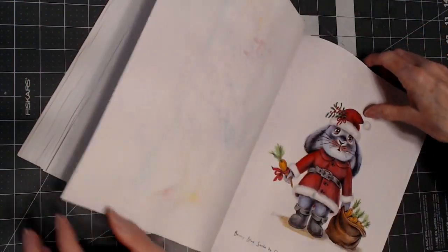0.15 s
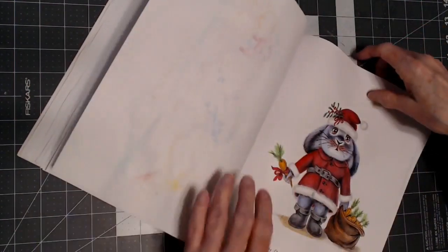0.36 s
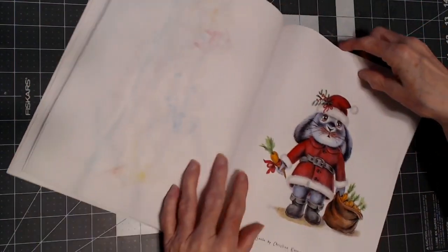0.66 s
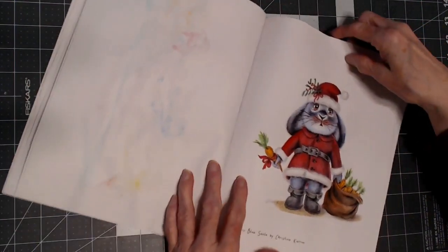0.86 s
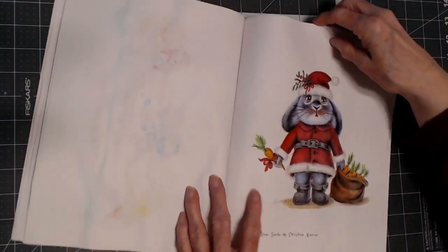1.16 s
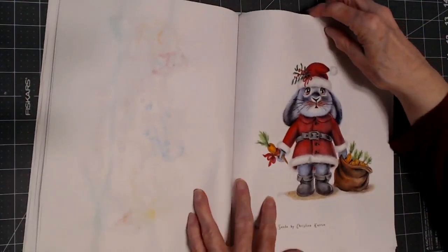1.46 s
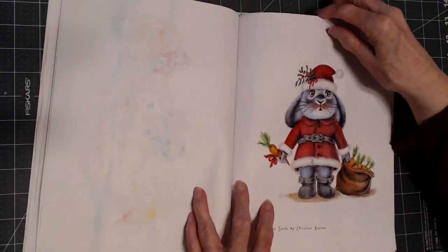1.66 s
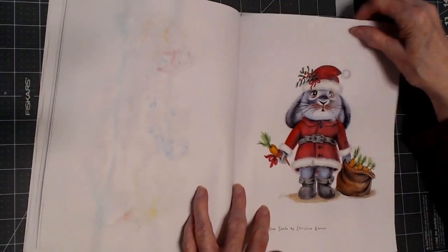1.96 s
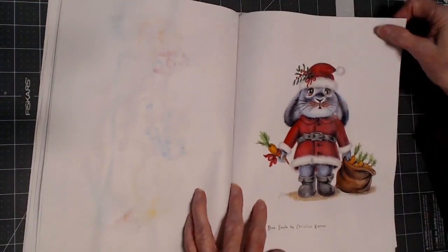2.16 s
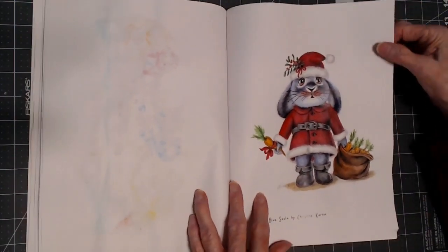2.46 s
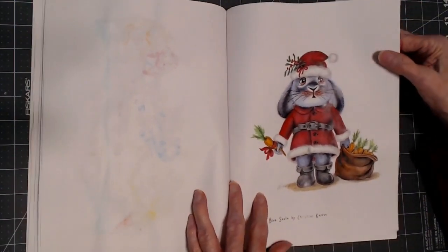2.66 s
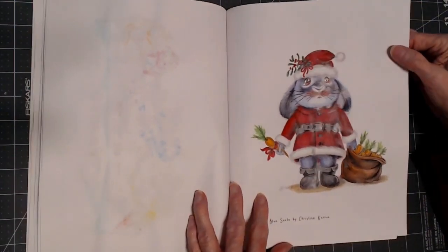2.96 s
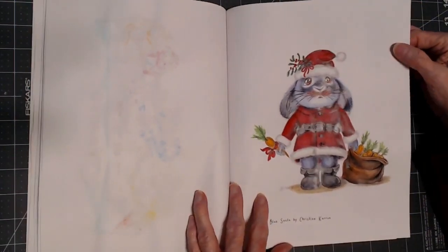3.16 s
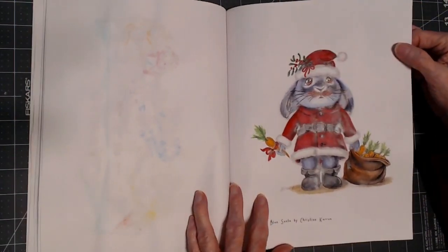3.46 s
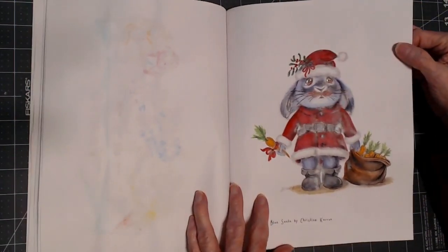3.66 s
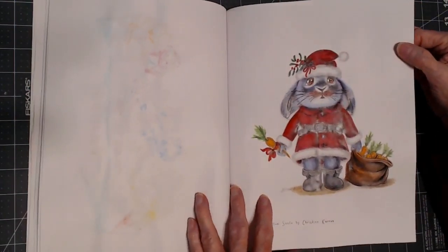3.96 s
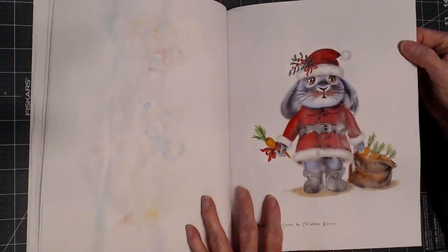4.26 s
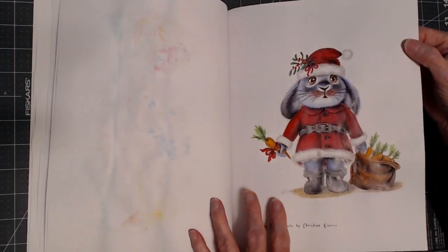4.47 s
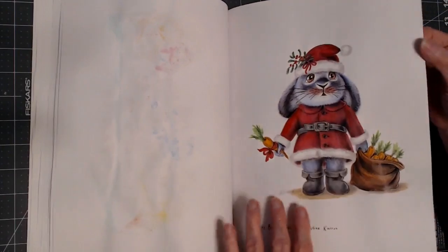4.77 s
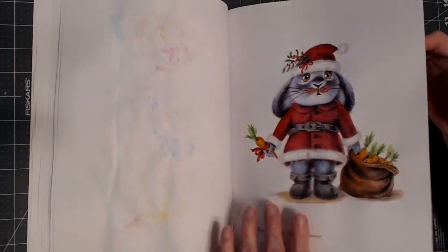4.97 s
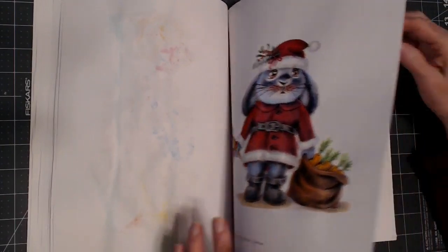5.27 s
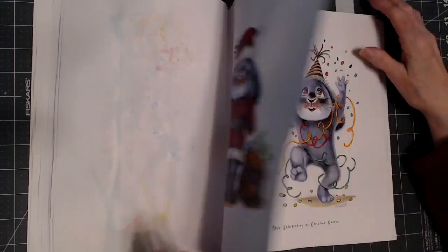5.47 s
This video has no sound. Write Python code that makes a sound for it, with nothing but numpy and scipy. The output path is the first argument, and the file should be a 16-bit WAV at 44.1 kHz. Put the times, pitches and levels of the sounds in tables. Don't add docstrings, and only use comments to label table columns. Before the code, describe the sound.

Close dry page rustling, crinkles and finger knocks on a thick book in a quiet room, with a rising muffled engine hum through the wall.

```python
import sys
import numpy as np
from scipy import signal
from scipy.io import wavfile
from scipy.ndimage import uniform_filter1d

SR = 44100
rng = np.random.default_rng(int(sys.argv[2]) if len(sys.argv) > 2 else 0)


def unload_wav(signal):
    wavfile.write(
        sys.argv[1],
        SR,
        np.round(np.clip(np.atleast_2d(signal).T, -1, 1) * 32767).astype(np.int16),
    )


def how_loud(loudness_db):
    steps = np.asarray(loudness_db, float) / 20
    return 10 ** steps


N = 247842
STEP = 64


def rms_one(x):
    return x / np.sqrt(np.mean(x ** 2) + 1e-20)


def peak_one(x):
    return x / np.abs(x).max()


def in_time(rows):
    seconds, *columns = np.transpose(rows)
    return [np.interp(np.arange(N) / SR, seconds, column) for column in columns]


def at_hz(points, hz):
    known_hz, value = np.array(points)[:, 0], np.array(points)[:, 1]
    return np.interp(np.log(hz), np.log(known_hz), value)


def drift(rate):
    r = np.exp(-80 * np.pi * rate / SR)
    slow = signal.lfilter([1], [1, -2 * r, r * r], rng.standard_normal(N // 40 + 2002))[2000:]
    return np.interp(np.arange(N) / 40, np.arange(len(slow)), rms_one(slow))


def resonance(x, hz, width):
    r = np.exp(-np.pi * width / SR)
    return signal.lfilter([(1 - r * r) / 2, 0, (r * r - 1) / 2], [1, -2 * r * np.cos(2 * np.pi * hz / SR), r * r], x)


def resonance_twice(x, hz, width):
    return resonance(resonance(x, hz, width), hz, width)


def band(order, low_hz, high_hz):
    return signal.butter(order, [low_hz, high_hz], "band", fs=SR, output="sos")


# pitch in Hz, likeness from -1 to 1.
LIKENESS_BY_PITCH = [(40, .85), (110, .98), (300, .88), (850, .92), (1300, .45), (3000, .28), (6000, .3),
                     (8500, .78), (12000, .82)]


def pair(mid, side, hz):
    alike = np.clip(at_hz(LIKENESS_BY_PITCH, hz), -1, 1)
    opposed = .7 * np.roll(mid, round(SR / hz / 4)) + .7 * side
    return np.sqrt((1 + alike) / 2) * mid + np.sqrt((1 - alike) / 2) * opposed * np.array([[1], [-1]])


def pan(db):
    return np.array([how_loud(db / 2), how_loud(-db / 2)])


# time in seconds, left minus right in dB.
HANDS_PLACE = [(0.0, -3.5), (.7, -2.5), (1.2, -2.6), (1.9, -4), (2.6, -2.5), (4.2, -2), (5.62, -0.5)]


def hands_pan_db():
    return in_time(HANDS_PLACE)[0]


def coloured(white, spectrum, patchy_db):
    out, edges = 0, 20 * 2 ** np.arange(.1, 10, .5)
    for k, (low, high) in enumerate(zip(edges, edges[1:])):
        hz = np.sqrt(low * high)
        if high > spectrum[0][0]:
            mid, side = signal.sosfilt(band(3, low, high), white[k % 2])
            level_db = at_hz(spectrum, hz) + patchy_db * drift(7.9)
            out = out + how_loud(level_db) * pair(mid, side, hz)
    return rms_one(out)


def in_modes(source, modes, wander_db):
    out = 0
    for k, (hz, width, db) in enumerate(modes):
        ring = pair(*resonance_twice(source[k % 2], hz, width * 1.27), hz)
        out = out + how_loud(db + wander_db * drift(9.6)) * ring
    return rms_one(out)


def held(rows, rise, fall):
    t = np.arange(0, N + STEP, STEP) / SR
    start, length, db = (np.array(rows)[:, k, None] for k in range(3))
    loss_db = np.maximum(rise * (start - t), fall * (t - start - length))
    return how_loud(db - np.maximum(0, loss_db))


def summed(gains, extra_db, rest_db):
    power = np.sum((gains * how_loud(np.reshape(extra_db, (-1, 1)))) ** 2, axis=0) + how_loud(rest_db) ** 2
    return np.interp(np.arange(N) / STEP, np.arange(len(power)), 10 * np.log10(power))


# pitch in Hz, level in dB per Hz.
ROOM_COLOUR = [(12, -31), (20, 7.5), (116, 6), (161, -2.5), (274, -7), (519, -13), (614, -35.5),
               (1380, -27), (3170, -36.5), (4310, -51), (6910, -42), (8170, -46.5), (14300, -40.5),
               (15500, -56)]
# pitch in Hz, width in Hz, level in dB.
ROOM_HUMS = [
    (602, 34, -83),
    (111, 4.7, -73.5),
]


def room():
    white = rng.standard_normal((2, 2, N))
    out = how_loud(-64) * coloured(white, ROOM_COLOUR, patchy_db=5.5)
    for hz, width, db in ROOM_HUMS:
        out = out + how_loud(db) * rms_one(resonance_twice(white[0, 0], hz, width))
    return out * pan(-1.5)[:, None]


# time in seconds, pitch in Hz.
FIRING_NOTE = [(2.6, 104), (2.9, 107.3), (3.07, 110), (3.3, 95.33), (3.45, 98.06), (3.56, 100.3),
               (3.78, 110), (3.84, 115.2), (3.97, 117.9), (4.15, 125.9), (4.3, 131), (4.52, 136.7),
               (4.63, 140.7), (4.78, 143), (4.92, 149.2), (5.15, 156.6), (5.3, 158.4), (5.62, 176.4)]
# multiple of its pitch, level in dB.
SIDE_ORDERS = [(.67, -25.5), (1.331, -32.5), (1.502, -24), (1.999, -21), (2.498, -39.5), (3, -37.5)]
# start in seconds, length in seconds, note level in dB, wall boom in dB over the note.
EXHAUST_SWELLS = [(2.798, 0.13, -35, -7.5), (2.95, .05, -45, -2), (3.025, 0.04, -49.5, 4),
                  (3.338, 0.018, -36, -4.5), (3.24, .02, -48, -3), (3.418, 0.08, -35.5, -13),
                  (3.52, 0.08, -30, -16.5), (3.624, 0.065, -32.5, -15), (3.7, 0.077, -29, -20),
                  (3.848, 0.074, -35, -15), (3.931, 0.13, -31, -19.5), (4.079, 0.069, -34.5, -10),
                  (4.193, 0.07, -41.5, -2.5), (4.311, 0.026, -40, -1), (4.407, 0.06, -45.5, -3.5),
                  (4.468, 0.07, -40, -9), (4.614, 0.17, -41.5, -3), (4.866, 0.12, -43, -4.5),
                  (5.14, 0.14, -42.5, -4), (5.338, 0.12, -48, 5.5), (5.493, 0.08, -62.5, 6)]


def vehicle():
    hz, = in_time(FIRING_NOTE)
    idle_db = -60.5
    swells = held(EXHAUST_SWELLS, rise=419.5, fall=420)
    note_db = summed(swells, 0, idle_db)
    boom_db = summed(swells, np.transpose(EXHAUST_SWELLS)[3], idle_db)
    over_hz = hz - 124.4
    growl_db = -58 + np.minimum(0.5 * over_hz, 0.25 * over_hz)

    turns = 2 * np.pi * np.cumsum(hz) / SR
    note = np.sqrt(2) * how_loud(0.69 * drift(21)) * np.sin(turns + .12 * drift(12))
    for multiple, db in SIDE_ORDERS:
        order_db = db + 12.5 + (growl_db - note_db) / 2 + 2.6 * drift(3.9)
        note += how_loud(order_db) * np.sin(multiple * turns + .9 * drift(8))

    white = rng.standard_normal((2, 2, N))
    boom = rms_one(resonance_twice(white[0, 0], 99, 28))
    low = rms_one(pair(*resonance_twice(white[1], 29, 30), 40))
    growl_modes = [(166, 40, 11.0), (222, 38, 5.0), (281.6, 7, 4.5), (385, 25, 1.0), (320.0, 70, 0.1)]
    growl = in_modes(white[::-1], growl_modes, wander_db=4.0)
    tone = how_loud(note_db) * note + how_loud(boom_db) * boom

    beat_hz = 3900
    error = (np.arange(N) * beat_hz / SR) % 1 - .5
    for line_hz in (9100, 13000):
        error += .022 * np.sin(2 * np.pi * line_hz * np.arange(N) / SR)
    tone += .75 * error * np.gradient(tone)

    heard = np.clip((np.arange(N) / SR - 2.45) / 1.18, 0, 1)
    return heard * (tone * pan(-2.23)[:, None] + how_loud(growl_db) * growl + how_loud(-59.5) * low * pan(-2.5)[:, None])


def desk_echo(x):
    t = np.arange(6000) / SR
    tail = pair(*rng.standard_normal((2, len(t))), 560) * how_loud(-60 * t / 0.1) * (t > .004)
    tail = signal.sosfilt(band(1, 350, 1900), tail)
    tail = tail / np.sqrt(np.sum(tail ** 2, axis=1, keepdims=True))
    return how_loud(-12.5) * signal.fftconvolve(x, tail, axes=1)[:, :N]


# start in seconds, length in seconds, level in dB, pitch in Hz, width in Hz.
EDGE_SWISHES = [(.25, .14, -59, 5000, 1200), (.16, .1, -64, 1500, 450), (.27, .13, -58, 1600, 600),
                (.1, .03, -47, 1300, 900), (.32, .04, -57, 3200, 1200), (1.7, .14, -66, 2900, 450),
                (1.885, .1, -56, 4900, 900), (1.955, .05, -59, 7000, 900), (1.874, .014, -53, 1800, 1500),
                (1.932, .045, -51, 1600, 1500), (2.716, .03, -64, 1400, 1500), (2.74, .04, -77, 3300, 400),
                (2.93, .15, -85, 2420, 150), (3.352, .02, -67, 1100, 900), (3.7, .015, -73, 4600, 2400),
                (5.16, .19, -68, 3250, 600), (4.468, .025, -63, 2200, 300), (1.23, .05, -66, 2800, 600),
                (1.204, .02, -57, 1200, 900), (4.96, .025, -54, 1800, 1600), (5.378, .045, -52, 2600, 1600),
                (5.468, .02, -52, 2600, 1600)]


def swishes():
    out = np.zeros((2, N + SR))
    lead = 2200
    t = np.arange(-lead, 14000) / SR
    for start, length, db, hz, width in EDGE_SWISHES:
        rub = rms_one(pair(*resonance_twice(rng.standard_normal((2, len(t))), hz, width), hz))
        loss_db = np.maximum(0, np.maximum(-2000 * t, 500 * (t - length)))
        at = round(start * SR) - lead
        out[:, at:at + len(t)] += how_loud(db - loss_db) * rub * pan(-2.5)[:, None]
    return out[:, :N]


# time in seconds, peak in dB.
FIBRE_TICKS = [(.0887, -24), (.0905, -25), (.0935, -31), (.388, -41), (.476, -47), (.5731, -24),
               (.844, -43), (.891, -43), (.902, -46), (.9159, -37), (.9583, -37), (1.0052, -43),
               (1.021, -46), (1.2945, -45), (1.6053, -57), (1.8727, -42), (1.9365, -37), (2.114, -56),
               (2.7173, -64),
               (4.0721, -50), (4.1923, -37), (5.0718, -27), (5.1381, -45), (5.3766, -36), (5.4065, -31),
                 (5.4664, -33), (5.504, -38), (5.5342, -41)]


def fibre_ticks():
    out, t, pan_db = np.zeros((2, N + 400)), np.arange(400) / SR, hands_pan_db()
    colour = band(1, 1800, 5600)
    for s, db in FIBRE_TICKS:
        click = signal.sosfilt(colour, rng.standard_normal((2, len(t))) * np.exp(-t / .0009))
        at = round((s - .0003) * SR)
        out[:, at:at + len(t)] += how_loud(db - 3) * peak_one(pair(*click, 9000)) * pan(pan_db[at])[:, None]
    return out[:, :N]


def fibres(per_s, spread_db, clump_db, smooth):
    rate = per_s * how_loud(clump_db * drift(22))
    catches = rng.random(N) < rate / SR
    sizes = how_loud(spread_db * np.minimum(rng.exponential(1, N), 5)) * catches
    return (rms_one(sizes) + smooth) * rng.standard_normal((2, 2, N))


def singing(source, gains, hz, width_hz):
    loudest_hz = np.repeat(hz[gains.argmax(axis=0)], STEP)[:N]
    now_hz = uniform_filter1d(loudest_hz, 1300) * (1 + .04 * drift(6))
    slow = signal.sosfilt(signal.butter(2, width_hz, fs=SR, output="sos"), source)
    return rms_one(pair(*(slow * np.cos(2 * np.pi * np.cumsum(now_hz) / SR)), hz.mean()))


def off_the_desk(x):
    for hz in 1500 + 450 * (np.arange(16) + rng.random(16)):
        depth = np.clip(.2 + drift(3), 0, .95)
        x = x - depth * resonance(x, hz, 260)
    return x


# start in seconds, length in seconds, hiss in dB,
# crumple in dB over the hiss, pitch of the air gap between the sheets in Hz.
SHEET_SLIDES = [(0.0, 0.38, -61, -2, 2500), (0.235, 0.045, -55, -5, 2074), (0.308, .11, -48.5, -2.5, 1705),
                (.46, 0.29, -62, -1.5, 2073), (0.8, 0.25, -64.5, -2, 1844), (1.057, .13, -69, -5, 2313),
                (1.22, 0.083, -61.5, 1, 2317), (1.384, .16, -75, -8, 1900), (1.624, .22, -66, -4, 2976),
                (1.89, .1, -55, -2, 1720), (2.034, .14, -68, -5.5, 1487), (2.207, .28, -64.5, -6, 2674),
                (2.71, .05, -84, 2, 1259), (2.92, 0.17, -84, 4, 2373), (2.552, .14, -82, -2.5, 1682),
                (4.02, .12, -77, 4.5, 1950), (4.214, 0.127, -77.5, -1, 1634), (4.425, 0.085, -70, -1, 2252),
                (4.59, 0.14, -65, -2, 2243), (4.808, .16, -74, -4.5, 2710), (3.695, .025, -80, 1, 2592),
                (5.093, 0.11, -73, 14, 1810), (5.188, 0.14, -78.5, 5.5, 3150), (5.374, .05, -65, 15, 1400),
                (4.99, .065, -73, 0.5, 2600), (5.47, .075, -67, 15, 1250), (4.957, .035, -74, 17, 1500),
                (1.93, .045, -56, 3, 1400), (.095, .03, -63, 9, 1550), (4.196, .035, -66, 16, 1300),
                (1.225, .03, -68, 8, 1500), (4.545, .02, -76, 16, 1500), (.58, .025, -61, 6, 1300),
                (4.33, .09, -78, 1, 2000)]
# start in seconds, length in seconds, level in dB, pitch of the hollow under the page in Hz.
BOOK_FLEXES = [(0.109, 0.069, -53, 757.8), (.21, 0.043, -58, 850), (.27, 0.065, -50, 890),
               (.34, 0.045, -45, 850), (.39, .03, -50, 700), (0.464, 0.22, -56, 640),
               (0.767, .05, -52.5, 850.4), (0.852, 0.085, -56.5, 720), (0.976, 0.081, -63, 848.4),
               (1.109, 0.21, -65.5, 720), (1.386, 0.047, -68.5, 834), (1.602, 0.18, -73.5, 750),
               (1.92, 0.05, -57, 850), (2.057, 0.14, -69.5, 700), (2.395, 0.06, -74, 650),
               (2.731, 0.02, -63.5, 620), (3.352, 0.028, -67.5, 559.4), (4.008, 0.12, -64, 740),
               (4.208, 0.087, -65.5, 713), (4.41, 0.035, -72, 620), (4.52, 0.028, -62, 660),
               (4.92, 0.086, -63, 700), (5.1, 0.056, -53, 700), (5.372, 0.055, -57, 714),
               (5.47, .085, -57.5, 680)]
# pitch in Hz, width in Hz, level in dB.
BODY_MODES = [(480, 470, -7.5), (700, 110, 6), (930, 820, -0.5), (1100, 500, -5)]
# pitch in Hz, width in Hz, level in dB.
CRINKLE_MODES = [(1300, 1100, 4.5), (1900, 1690, 4), (2700, 570, 10), (2987, 500, 4.5), (3420, 450, -16.5)]
# pitch in Hz, level in dB per Hz.
HISS_COLOUR = [(1940, -44.5), (3300, -10), (4060, -12), (4800, 12.5), (6300, -0.5), (7180, -7),
               (8170, -21.5), (11000, -8.5), (14400, -17), (15500, -31)]
# pitch in Hz, width in Hz, level in dB.
EDGE_WHISTLES = [(4280, 74, 0), (4636, 240, -5), (6000, 870, -1.5), (6770, 73, -0.5), (6820, 3400, -13),
                 (7030, 390, 0)]


def rustle():
    crumple_db, gap_hz = np.transpose(SHEET_SLIDES)[3:]
    fall = 351
    rises = 402 * (1 + .3 * np.maximum(crumple_db, 0))
    slides = held(SHEET_SLIDES, rises[:, None], fall)
    flexes = held(BOOK_FLEXES, 800, fall)

    hiss_db = summed(slides, 0, -99)
    crinkle_db = summed(slides, crumple_db, -99)
    body_db = summed(flexes, 0, -79.5)

    source = fibres(per_s=1200, spread_db=3, clump_db=4, smooth=1.9)
    hollow = singing(source[1], flexes, np.transpose(BOOK_FLEXES)[3], width_hz=79)
    body = rms_one(in_modes(source, BODY_MODES, wander_db=3.0) + 1.1 * hollow)
    gap = singing(source[0], slides, gap_hz, width_hz=210)
    crinkle = in_modes(source, CRINKLE_MODES, wander_db=3.5) + .6 * gap
    whistles = in_modes(source, EDGE_WHISTLES, wander_db=5)
    hiss = off_the_desk(coloured(source, HISS_COLOUR, patchy_db=3.2) + .9 * whistles)

    out = how_loud(body_db) * body + how_loud(crinkle_db) * crinkle + how_loud(hiss_db) * hiss
    return out * pan(np.clip(hands_pan_db(), -7, 7))


# time in seconds, peak in dB, ring pitch in Hz, crispness in dB, length in seconds.
SHEET_CRACKS = [(0.088, -11.5, 3100, -16, 0.004), (0.091, -14, 1600, -16, 0.007),
                (0.094, -31, 823, -8, 0.026), (.082, -37, 2100, -9, .006), (0.112, -33, 480, -25, 0.033),
                (.135, -38.5, 430, -23, 0.011), (0.173, -45, 640, -13, 0.0065),
                (0.572, -29, 3150, -6.5, 0.005), (0.492, -36.5, 1260, -8.5, 0.0058),
                (.573, -28, 627, 0.5, 0.018), (.574, -30, 1260, 3.5, 0.0086),
                (0.746, -33, 1530, -20, 0.0045), (1.203, -27, 728, -20, 0.005),
                (1.872, -33, 2093, -11, .006), (1.874, -34.5, 1250, -11, 0.014),
                (1.937, -37, 1285, 1.5, 0.039), (1.95, -41.5, 850, 5, 0.015),
                (2.114, -55, 1970, -14, 0.0038), (4.191, -21.5, 2479, -14.5, 0.012),
                (4.193, -26, 1514, -3.5, 0.019), (4.475, -49, 2163, -30, 0.0042),
                (4.543, -44, 1044, -18, 0.012), (4.959, -29, 873, -12, 0.023),
                (4.96, -33, 2200, -17, 0.015), (5.028, -39, 1290, -14, 0.0042),
                (5.071, -19.5, 2115, -4.5, 0.0044), (5.072, -21, 3650, -14.5, .005),
                (5.084, -20.5, 900, -5, 0.0077), (5.096, -26.5, 558, -4.5, 0.026),
                (5.138, -24, 1016, -12, 0.0094), (5.151, -31, 1045, -16, 0.0089),
                (5.376, -30.5, 3110, -2.5, 0.02), (5.393, -28, 1330, -10.5, 0.025),
                (5.407, -20, 2050, -6, 0.006), (5.409, -30, 743, -5.5, .025),
                (5.466, -22.5, 1790, -5.5, 0.006), (5.471, -31, 800, -4, 0.018),
                (5.494, -26.5, 622, -18, 0.012), (5.503, -18, 700, -9, 0.012),
                (5.533, -28.5, 1410, -7, 0.02)]
# time in seconds, peak in dB, crispness in dB, cavity pitch in Hz.
FINGER_TAPS = [(.348, -37.5, -1, 800), (.389, -50, 4, 780), (.843, -64, 5, 746), (.878, -54, 5, 714),
               (.891, -46.5, 1, 700), (.901, -48, 7, 725), (.916, -45.5, 0.5, 705), (1.005, -60, 3, 830),
               (1.021, -54.5, 7.5, 833), (1.23, -45.5, 0.5, 810), (1.294, -46.5, -2.5, 653),
               (1.912, -47, -0.5, 720)]
# time in seconds, peak in dB, crispness in dB, cavity pitch in Hz.
PAD_KNOCKS = [(.46, -42, -6, 602), (.472, -37, -4, 590), (.527, -37, -12, 640), (.567, -36, -9, 633),
              (.602, -48, -20, 680), (.689, -59, -15, 715), (.731, -52, -8, 686), (.748, -37, -8, 737),
              (.759, -44, -15, 725), (.866, -41.5, -4.5, 675), (.959, -35, -10, 710),
              (1.116, -56, -17, 690), (1.595, -51.5, -21, 726), (1.945, -48, -20, 340),
              (2.059, -41.5, -28, 705), (2.078, -44.5, -22, 680), (2.173, -54, -24, 687),
              (2.717, -49, -10, 623), (2.722, -45.5, -13, 1256), (2.735, -54, -9, 624),
              (3.326, -58.5, -21, 521), (3.35, -52.5, -13.5, 523), (4.011, -45, -12, 731),
              (4.031, -48, -13, 745), (4.072, -43.5, 2, 746), (4.112, -49, -11, 718),
              (4.212, -34, -2.5, 700), (4.22, -38.5, -20, 427), (4.228, -40, -2, 757),
              (4.285, -49, 3.5, 673), (4.312, -45, -6, 726), (4.413, -48, -9.5, 600),
              (4.549, -34, -10.5, 658), (4.965, -32.5, -20, 440), (5.09, -33, -22, 420),
              (5.505, -34.5, -23, 310), (5.512, -33, -18, 542)]


def buckles():
    tick_follows = 1.3
    crack_tilt_db, knock_tilt_db = 0.87, 1.7
    rows = []
    for s, db, hz, crisp_db, length in SHEET_CRACKS:
        rows.append((s, db, hz, crisp_db, 4 + tick_follows * crisp_db, length, crack_tilt_db))
    for s, db, crisp_db, hz in FINGER_TAPS:
        rows.append((s, db, hz, crisp_db, -6 + tick_follows * crisp_db, 0.0076, crack_tilt_db))
    for s, db, crisp_db, hz in PAD_KNOCKS:
        rows.append((s, db, hz, crisp_db, -16.5 + tick_follows * crisp_db, 0.011, knock_tilt_db))
    return rows


def one_snap(t, lead, hz, sheet_db, bright_db, length, tilt_db):
    noise, spots = rng.standard_normal((2, 2, len(t))), rng.random((9, 2))
    length = np.clip(length, .003, .04)
    tail = .3 * np.exp(np.where(t < 0, t / (.35 * length), -t / length))
    tail *= how_loud(5.0 * np.repeat(rng.standard_normal(len(t) // 100), 100))
    crack = np.exp(np.where(t < 0, t / .0007, -t / .002)) + tail
    struck = noise * crack
    struck[:, 0, lead] += 12

    ring = resonance(struck[0], hz, hz)
    ring = resonance(ring, hz, .18 * hz)
    ring = pair(*resonance(ring, hz, .36 * hz), hz)

    fade = np.exp(-np.maximum(t, 0) / 0.21)
    modes_hz = 700 * 1.19 ** (np.arange(len(spots)) + spots[:, 0])
    sheet = 0
    for k, (mode_hz, loud) in enumerate(zip(modes_hz, spots[:, 1])):
        push = (noise[k % 2] * crack + .3 * struck[k % 2]) * fade ** k
        mode = resonance(resonance(push, mode_hz, .25 * mode_hz), mode_hz, .5 * mode_hz)
        sheet = sheet + how_loud(4 * loud - tilt_db * k) * pair(*mode, mode_hz)

    tick = signal.sosfilt(band(2, 3300, 7600), noise[0] * (0.33 * crack + tail))
    tick += 0.26 * np.diff(noise[1] * (0.19 * crack + tail), prepend=0)
    tick = pair(*tick, 8000)
    return peak_one(ring) + how_loud(sheet_db + 9.5) * peak_one(sheet) + how_loud(bright_db - 10.0) * peak_one(tick)


def snaps():
    lead, pan_db = 900, hands_pan_db()
    out, t = np.zeros((2, N + 7000)), (np.arange(5200) - lead) / SR
    for s, db, *shape in buckles():
        hit = one_snap(t, lead, *shape)
        at = round((s + 0.00119) * SR) - lead
        place = pan(np.clip(pan_db[at + lead], -7, 7))[:, None]
        out[:, at:at + len(t)] += how_loud(db - 3.5) * hit * place
    return out[:, :N]


def scene():
    hits = snaps()
    return room() + vehicle() + desk_echo(hits) + swishes() + fibre_ticks() + rustle() + hits


def roll_off(x):
    return signal.sosfilt(signal.butter(12, 16360, fs=SR, output="sos"), x)


# time in seconds, level in dB.
DROPPED_SAMPLES = [
    (3.428, -43.5),
    (3.929, -34.5),
]


def record(dry):
    ticks = np.zeros(N)
    for s, db in DROPPED_SAMPLES:
        ticks[round(s * SR)] = how_loud(db)
    low_pass = signal.cheby2(10, 50, 15250 * 1.02, fs=SR, output="sos")
    return roll_off(signal.sosfilt(low_pass, dry + ticks))


dry = scene()
out = record(dry)
unload_wav(out)
```